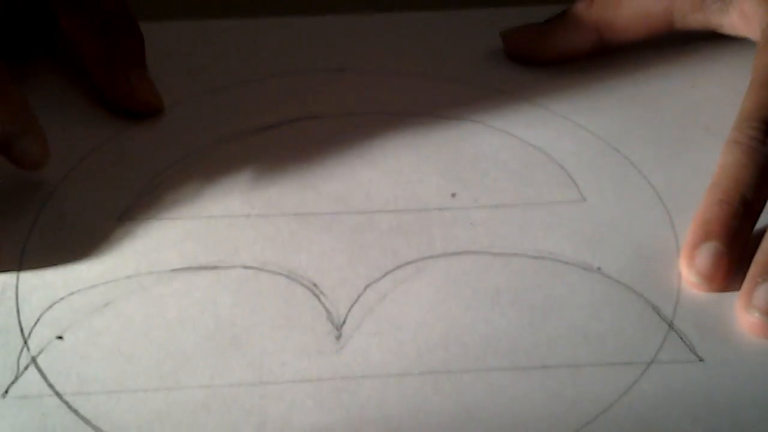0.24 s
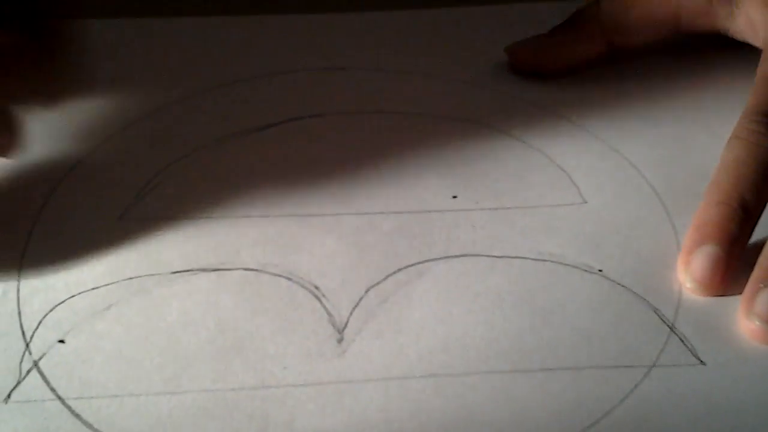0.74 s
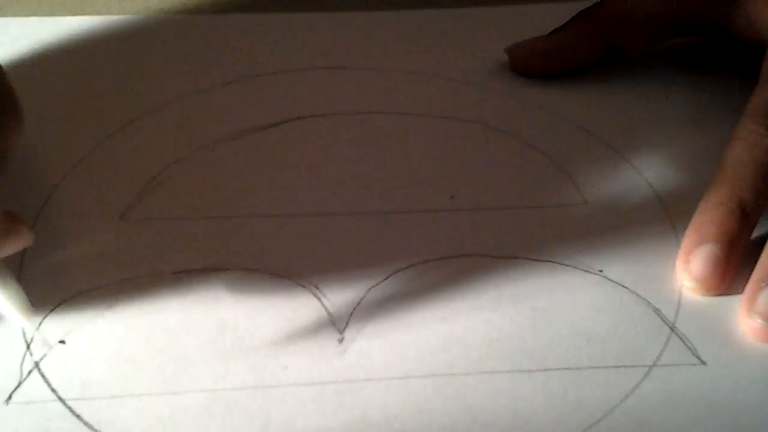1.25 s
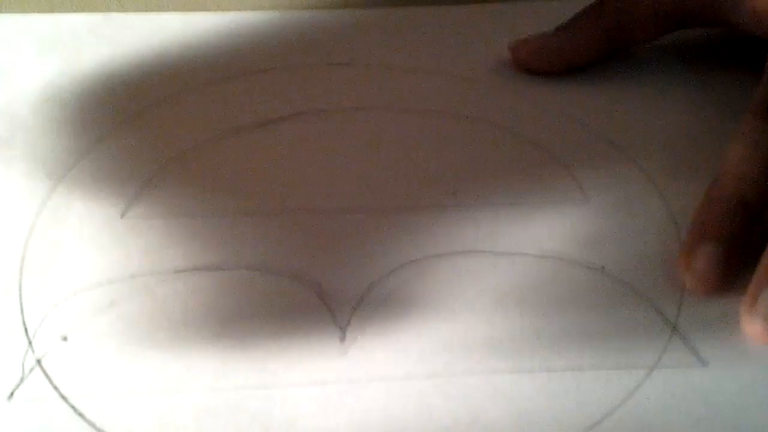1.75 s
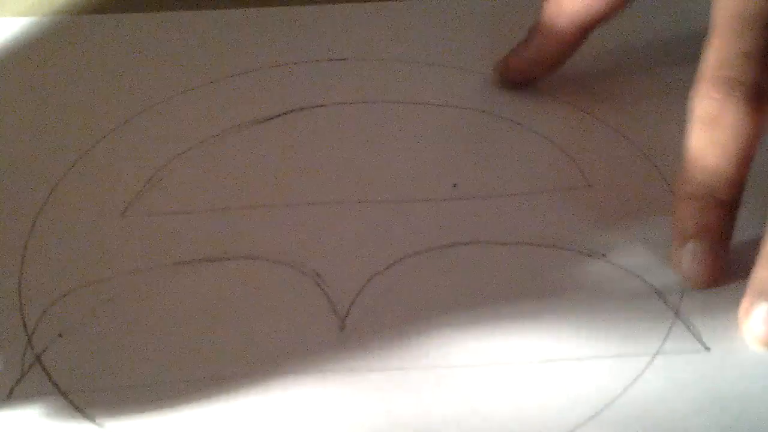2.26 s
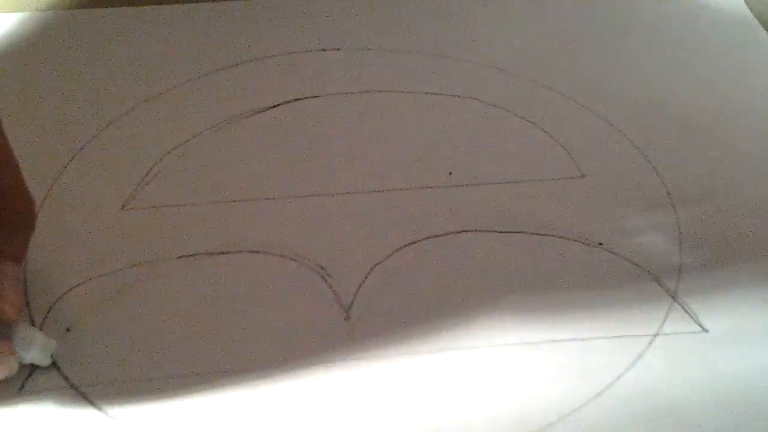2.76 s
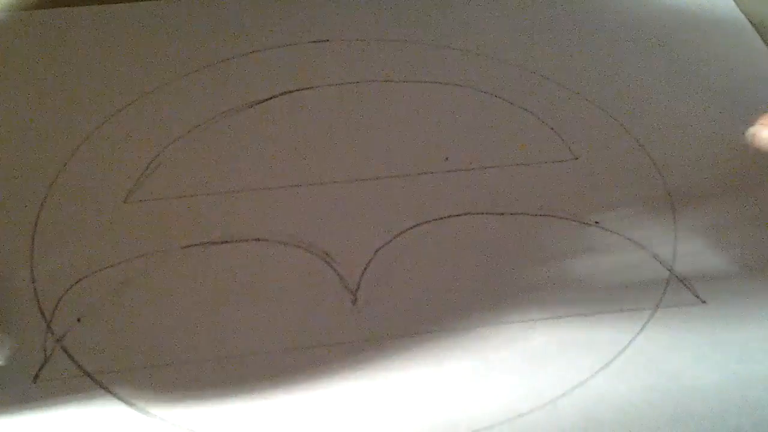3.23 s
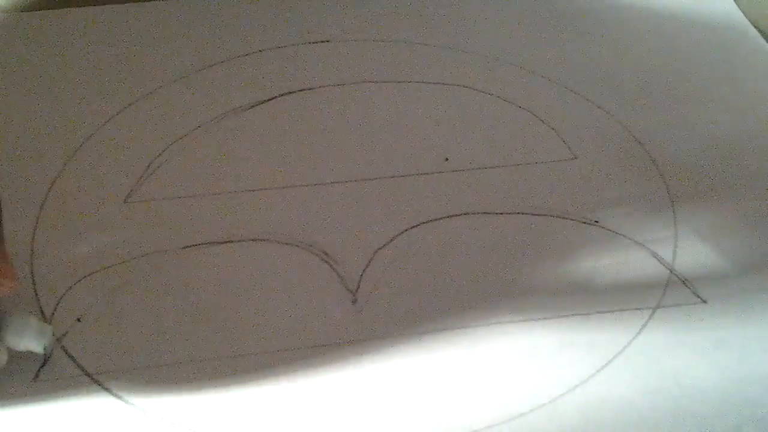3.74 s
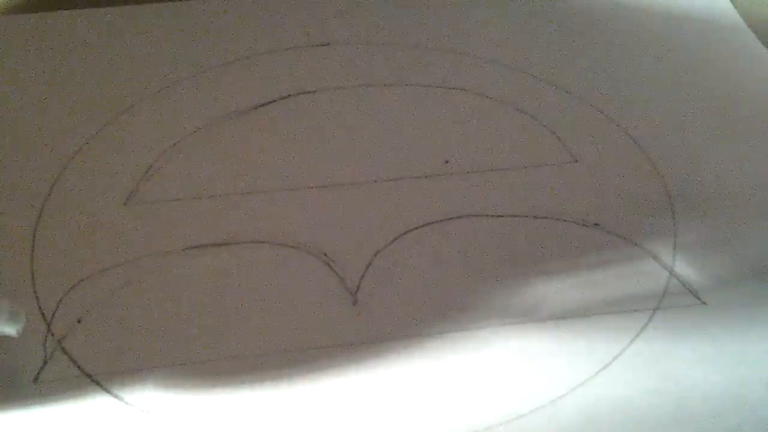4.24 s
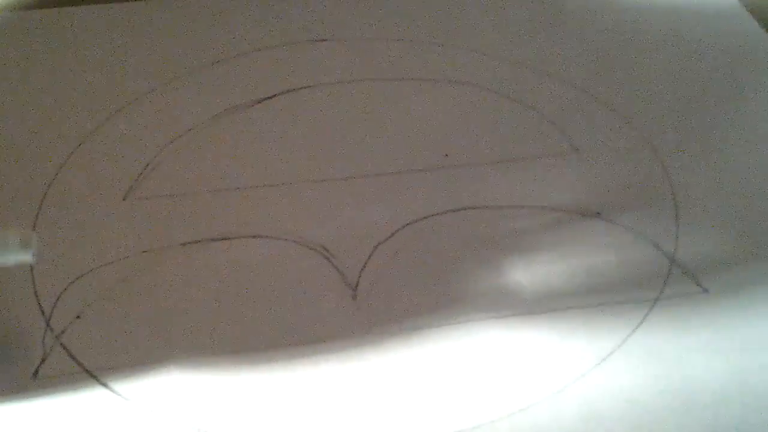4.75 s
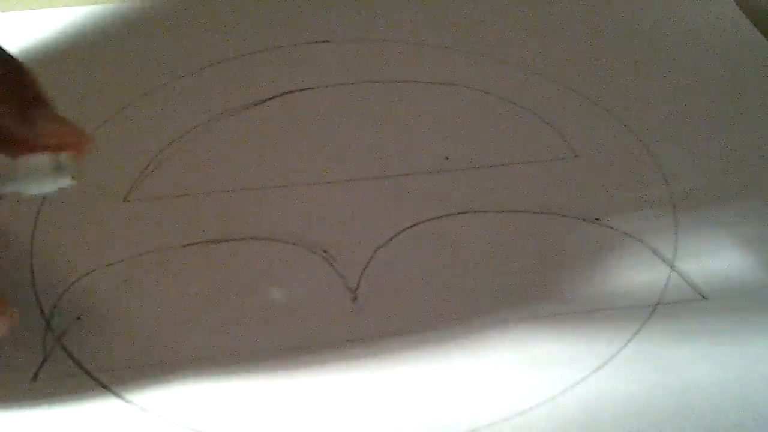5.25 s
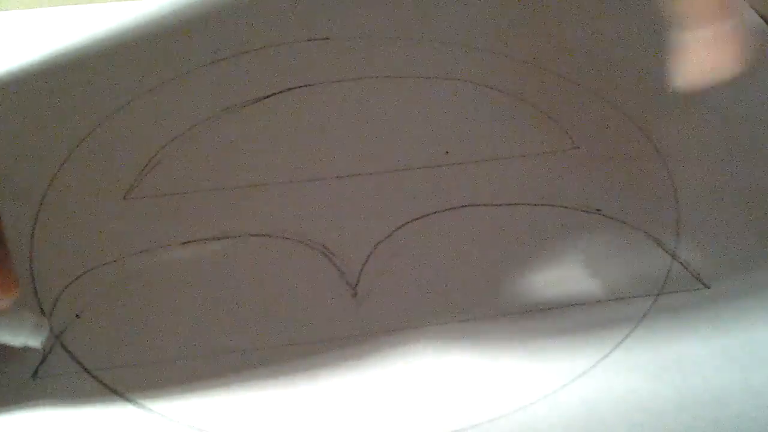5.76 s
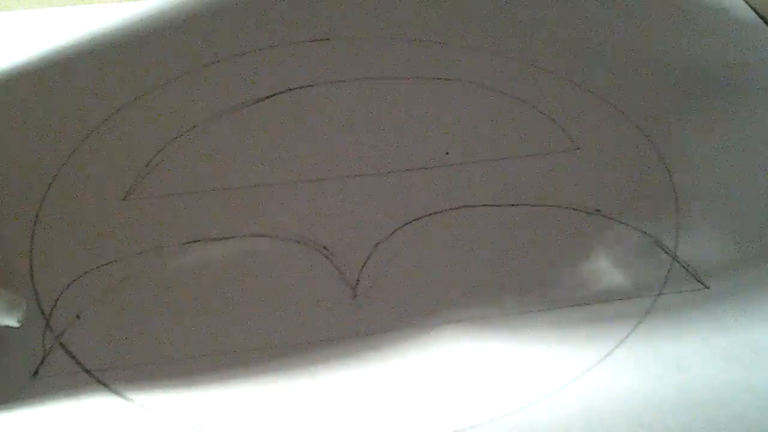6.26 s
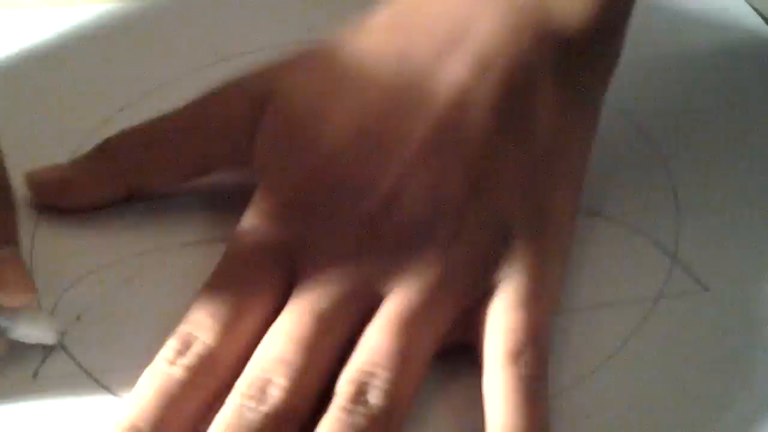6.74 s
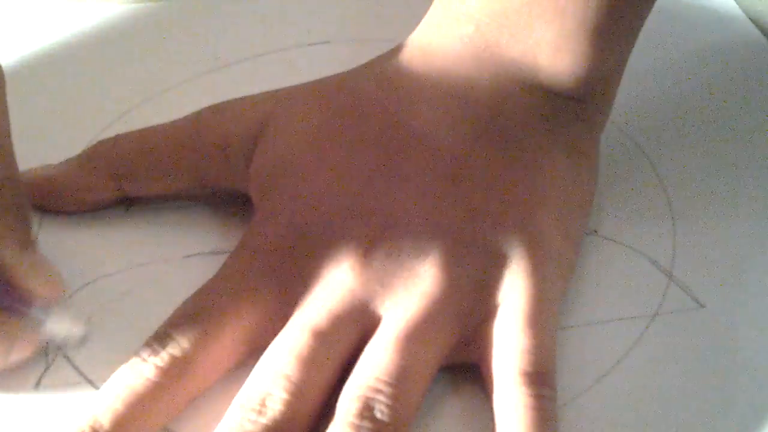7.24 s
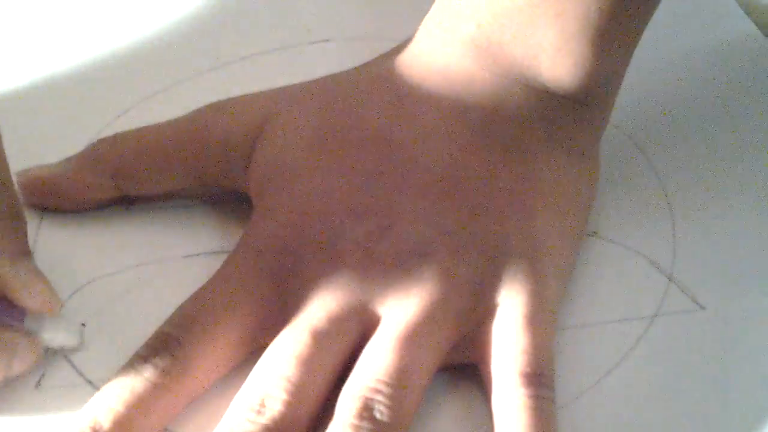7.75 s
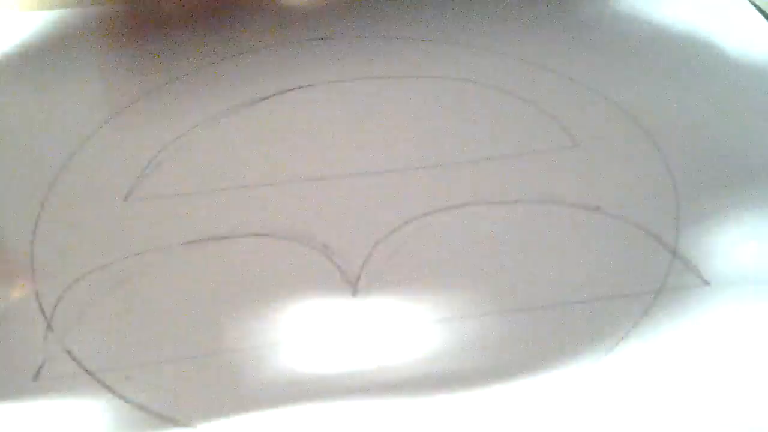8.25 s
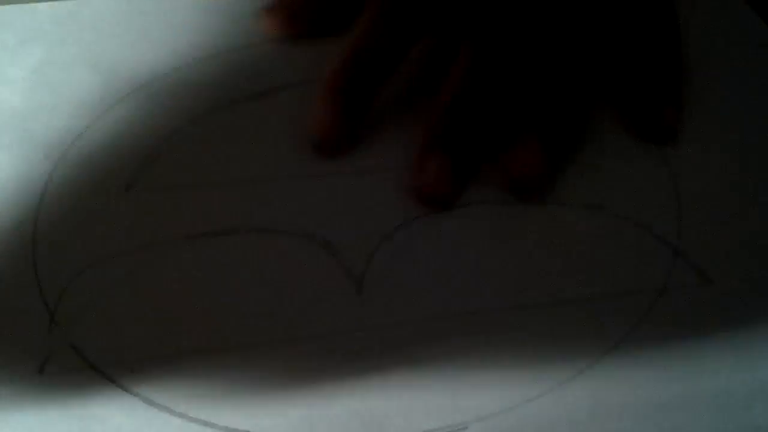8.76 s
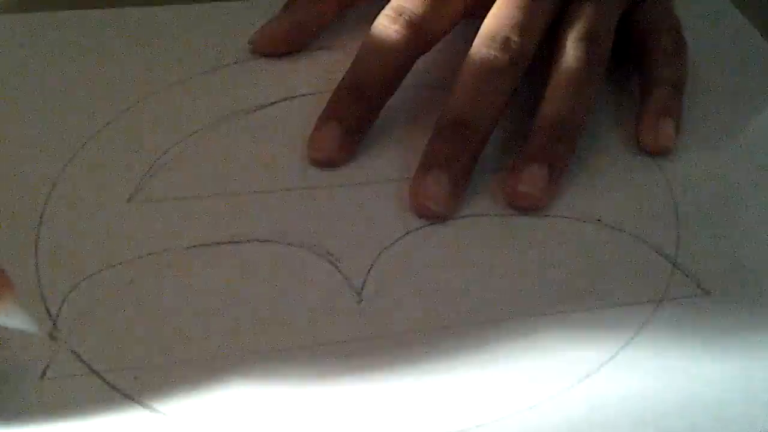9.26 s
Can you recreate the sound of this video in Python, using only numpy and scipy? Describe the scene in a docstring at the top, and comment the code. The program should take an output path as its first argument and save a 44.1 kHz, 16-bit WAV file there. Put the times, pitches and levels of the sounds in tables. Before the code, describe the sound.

Close to a small microphone in a quiet room, hands shift a large sheet of paper on a desk. Faint rubs and a lull come first, then a cluster of knocks and crisp paper snaps near two seconds. Short scrapes continue, peaking in a sharp crackle around five seconds, then thinning to near silence before soft rubbing resumes.

```python
"""Hands and a wrapped pencil end rub and shift a large sheet of paper on a desk, close to a small camera.
Faint rubs and a quiet gap come first; strokes, snaps and taps crowd near 2 s and are loudest around 5 s.
Then the handling slackens, nearly stops after 7.5 s, and takes up again softly from 8 s to the end.
Dense grains of fibre slip ring sheet and desk; snaps, taps and thuds are short bursts of ringing.
Room noise lies under it all; two close microphone ports hear nearly the same sound."""
import sys
import numpy as np
from scipy import signal
from scipy.io import wavfile
from scipy.ndimage import uniform_filter1d

SR = 44100
rng = np.random.default_rng(int(sys.argv[2]) if len(sys.argv) > 2 else 0)


def bounce(signal):
    """Save signal as a 16-bit WAV file at the path given by the first command-line argument."""
    frames = np.transpose(np.atleast_2d(signal))
    limited = np.clip(frames, -1, 1)
    pcm = np.round(limited * 32767).astype(np.int16)
    wavfile.write(sys.argv[1], SR, pcm)


def convert_level_to_amplitude(level_db):
    """Map a level in decibels to its linear amplitude factor."""
    exponent = np.asarray(level_db, float) / 20
    return 10 ** exponent


N = 418931

# Room noise spectrum. Each row: frequency in Hz, relative density in dB.
ROOM_SPECTRUM = [(12, -5.5), (25, -17), (43, -22), (62, -31.5), (106, -12.5), (224, -8), (394, -6),
                 (749, -10), (1060, -15), (3180, -14.5), (5140, -21), (13800, -21), (15000, -26)]
ROOM_RMS_DB = -69
# Left-right likeness of the room noise. Each row: frequency in Hz, correlation from 0 to 1.
ROOM_LIKENESS = [(60, 0.99), (180, 0.98), (550, 0.98), (1650, 0.92), (4970, 0.72), (15000, 0.054)]
# Thin tones, faint in the quiet and stronger amid the handling. Each row: start in seconds, end in seconds,
# pitch in Hz, rms before the fades in dB.
TONES = [(0, 0.1, 1900, -74), (0.898, 1.15, 2150, -75), (1.4, 1.717, 1845, -73.5),
         (2.017, 2.082, 1850, -55), (4.29, 4.36, 3810, -53), (7.683, 7.853, 2390, -75)]

# Desk radiation spectrum. Each row: frequency in Hz, relative density in dB.
DESK_SPECTRUM = [(35, -68), (60, -26.5), (121, -14), (280, -7.5), (405, -1), (471, -3), (702, -3.5),
                 (762, -4.5), (1600, -13), (2080, -34), (3520, -120)]
# Desk top modes. Each row: frequency in Hz, width in Hz, relative gain in dB.
DESK_MODES = [(225, 11, -4.5), (328.6, 19, 2), (407, 18, -0.5), (614, 130, -7), (928, 29, -8),
              (1880, 36, -9)]
# The heel of the hand settles and the whole desk thuds. Each row: start in seconds, burst peak in dB.
THUDS = [(0.177, -55), (0.208, -59), (0.55, -68), (1.86, -62), (1.939, -51.5), (2.0, -57), (2.045, -57),
         (3.364, -56), (4.029, -62), (6.813, -61)]
# Fingers and wrist land on the desk. Each row: start in seconds, blow peak in dB, ring in Hz.
TAPS = [(0.117, -39, 875), (0.1809, -40.5, 423), (0.207, -46, 362), (0.304, -45.5, 374), (0.554, -47, 392),
        (1.86, -56, 608), (1.9345, -29, 440), (1.948, -34, 326), (1.999, -38, 295), (2.0452, -27, 376),
        (2.189, -23.5, 426), (2.4, -47.5, 470), (2.455, -35, 490), (2.95, -43, 424), (3.3654, -34.5, 370),
        (3.441, -44.5, 680), (3.637, -44.5, 610), (3.789, -50, 423), (4.322, -42.5, 553), (4.359, -42, 420),
        (4.657, -36, 627), (4.845, -39, 800), (4.862, -34, 550), (5.151, -38, 400), (5.422, -40, 700),
        (6.135, -34.5, 820), (6.812, -47, 655), (7.068, -41.5, 637)]

# The sheet buckles or the pencil lands. Each row: start in seconds, ring burst peak in dB, ring in Hz,
# treble edge share in dB (before a fixed factor).
SNAPS = [(0.1182, -30, 2600, -37), (0.212, -38, 2820, -15), (0.308, -32.5, 2760, -25),
         (0.624, -39.5, 2700, -27), (1.3356, -38, 2550, -28), (1.347, -38, 2880, -32),
         (1.876, -38.5, 3820, -9), (1.9516, -33, 2730, -13), (1.9941, -20.5, 2170, -12.5),
         (2.181, -26, 2600, -30), (2.199, -17, 2480, -38), (2.209, -19, 2880, -37), (2.28, -28, 3150, -21),
         (2.531, -44, 3600, -25), (2.669, -36.5, 2820, -32), (2.811, -29, 3400, -34),
         (2.9525, -37, 1220, -25), (3.489, -36, 2700, -33), (3.643, -32.5, 2250, -36),
         (3.7926, -30.5, 1680, -38), (4.13, -35.5, 2260, -29), (4.659, -19.5, 2470, -52),
         (4.6605, -24.5, 1070, -45), (4.867, -19.5, 2800, -13), (5.153, -18.5, 3000, -23),
         (5.1625, -15.5, 2750, -40), (5.188, -21, 3180, -35), (5.4148, -30, 2520, -37),
         (5.6405, -46, 2460, -25), (5.678, -40, 1800, -18), (5.901, -40.5, 2090, -27),
         (5.9188, -42, 2170, -25), (6.1414, -28.5, 2620, -32), (6.338, -44, 2800, -27),
         (6.876, -48, 1510, -27), (6.927, -43.5, 2520, -13), (7.0757, -24.5, 1970, -38),
         (7.158, -43, 1950, -16), (7.354, -40, 2760, -22), (7.395, -50, 1500, -28), (8.283, -40, 3300, -4),
         (8.6674, -51.5, 1500, -32), (9.1986, -45, 2650, -37), (9.263, -36, 3230, -19),
         (9.3312, -34, 3400, -19)]
RATTLE_DB = -9  # slips that follow a snap, relative to its burst
# The sheet crumples in a dense cluster of slips. Each row: start in seconds, level in dB (before a fixed
# factor), ring in Hz, nominal length in seconds.
CRUNCHES = [(0.103, -50, 2700, 0.0097), (2.158, -36, 2800, 0.035), (2.444, -30, 670, 0.045),
            (2.446, -34.5, 1400, 0.028), (2.479, -43, 725, 0.095), (2.53, -48, 806, 0.1),
            (4.272, -27, 2980, 0.0078), (4.354, -30.5, 2800, 0.021), (4.864, -26.5, 2800, 0.014),
            (5.153, -19.5, 3170, 0.024), (5.789, -42, 1660, 0.014), (5.802, -43.5, 2900, 0.0069),
            (7.042, -38.5, 2420, 0.014), (7.4, -47, 2930, 0.024), (7.942, -49, 3000, 0.023)]

# Hands and pencil end move over the sheet. Each row: fastest moment in seconds, drive level in dB,
# rise in seconds, fall in seconds, desk weight in dB (before a fixed share).
STROKES = [(0.12, -50.5, 0.041, 0.07, -4.5), (0.216, -49, 0.07, 0.07, 5), (0.319, -51, 0.05, 0.12, -6),
           (0.554, -59.5, 0.045, 0.15, 3), (0.634, -55.5, 0.036, 0.05, 1.5), (0.878, -59, 0.11, 0.11, -2),
           (1.347, -56.5, 0.037, 0.074, 2), (1.383, -49, 0.079, 0.093, 0), (1.731, -69, 0.041, 0.047, -3),
           (1.842, -62.5, 0.0077, 0.077, 9.5), (1.881, -47.5, 0.033, 0.21, -5),
           (1.954, -41, 0.017, 0.19, -8), (2.055, -65, 0.017, 0.12, 9), (2.192, -34.5, 0.048, 0.18, -2.5),
           (2.462, -46.5, 0.027, 0.1, 11.5), (2.81, -38, 0.059, 0.063, -5),
           (2.854, -46.5, 0.093, 0.038, -0.5), (3.223, -64, 0.055, 0.17, 1),
           (3.372, -63.5, 0.027, 0.087, 10), (3.495, -48.5, 0.025, 0.12, -10),
           (3.72, -51.5, .04, 0.081, -12), (3.86, -51, 0.1, 0.069, -14), (4.006, -50, 0.018, 0.14, -25),
           (4.05, -45.5, 0.06, 0.21, -9.5), (4.26, -61, 0.12, .05, 0), (4.277, -43, 0.012, 0.095, -9.5),
           (4.364, -46.5, 0.021, 0.1, -5), (4.475, -65, 0.066, 0.06, -20), (4.666, -61, 0.016, 0.3, 9.5),
           (4.866, -25, 0.01, 0.034, -12), (4.907, -37.5, .05, 0.14, -11.5), (5.26, -40, 0.12, 0.21, -8.5),
           (5.423, -46, 0.065, 0.04, -1), (5.692, -63, 0.16, 0.082, 0.5), (5.802, -57, .024, 0.059, -5.5),
           (5.907, -57.5, 0.02, 0.059, 0), (6.142, -46.5, 0.12, 0.056, -5), (6.25, -47.5, 0.16, 0.072, -24),
           (6.815, -59, 0.052, 0.071, 0), (6.939, -56, 0.11, 0.18, -1), (7.079, -44.5, 0.04, 0.044, -4.5),
           (7.16, -62, 0.091, 0.12, 3), (7.353, -60, 0.038, 0.077, -7), (7.408, -55.5, 0.064, 0.047, 0.5),
           (8.275, -50, 0.12, 0.086, -6), (8.39, -47.5, 0.32, 0.18, -1), (8.53, -60.5, .05, 0.14, 4.5),
           (8.81, -63, 0.082, 0.092, -5), (8.995, -55.5, 0.021, 0.1, -6.5),
           (9.034, -53.5, 0.046, 0.054, -13), (9.204, -54, 0.031, 0.047, 2), (9.269, -53, 0.014, 0.1, -5),
           (9.339, -50.5, 0.07, 0.078, -3), (9.495, -54, 0.019, .05, -5)]
# A hand keeps sliding. Each row: start in seconds, end in seconds, drive level at start in dB,
# drive level at end in dB, desk weight in dB (before a fixed share).
SLIDES = [(2.036, 2.124, -56, -60, 10.5), (2.508, 2.7, -58, -52, -3), (2.956, 3.104, -54.5, -55, -2.5),
          (3.367, 3.48, -59.5, -64.5, 9.5), (3.644, 3.76, -54, -55, -7), (3.796, 3.938, -51.5, -62, -2.5),
          (4.287, 4.35, -50.5, -52.5, -14), (4.662, 4.843, -59, -42, -8.5),
          (5.158, 5.228, -29.5, -36.5, -9.5), (5.435, 5.632, -50.5, -64, -4),
          (6.143, 6.355, -51.5, -55, -2), (6.382, 6.529, -62.5, -61, -1.5), (6.61, 6.753, -64.5, -77, -4),
          (7.948, 8.1, -61.5, -87.5, 1), (8.15, 8.509, -60, -52, -1)]
SWING_DB = 20  # gained in a rise time, lost in a fall time
LAND_S, LIFT_S = 0.022, 0.064  # rise and fall time at the ends of a slide
DESK_FOLLOWS = 0.81  # the heavy desk swells and dies less steeply than the sheet
USUAL_DB = -50  # a middling stroke
HISS_DB, HISS_FOLLOWS = -61, 0.68  # fibre hiss of a middling stroke; dB of hiss per dB of sheet
# Sheet radiation spectrum. Each row: frequency in Hz, relative density in dB.
SHEET_SPECTRUM = [(500, -41), (900, -4), (1500, -5), (2500, -4), (3500, -1.5), (4200, -3), (5600, -10),
                  (8500, -45)]
# Fibre hiss spectrum. Each row: frequency in Hz, relative density in dB.
FIBRE_SPECTRUM = [(3500, -25.5), (5200, -15.5), (6500, -8), (9000, -10), (14500, -14)]
# The free area of the sheet sets its ring. Each row: time in seconds, mean ring in Hz.
FREE_AREA_RING = [(0.0, 1890), (0.08, 2560), (1.32, 2520), (1.38, 2960), (1.561, 1830), (1.88, 3120),
                  (2.04, 2320), (2.27, 2740), (2.46, 1820), (2.62, 3250), (3.86, 2260), (4.05, 3540),
                  (4.15, 2340), (4.31, 3460), (4.42, 2480), (5.25, 3300), (5.79, 1900), (5.84, 2220),
                  (6.98, 2750), (7.06, 2380), (8.25, 3370), (8.4, 2580), (8.63, 3040), (8.679, 1662),
                  (8.73, 2800), (9.5, 3160)]
# Air gap and sheet ring in narrow bands that come and go as the hands shift.
# Each row: mean frequency in Hz, width in Hz, mean gain in dB.
SHEET_MODES = [(1980, 165, -9.5), (2400, 340, -5), (2800, 187, -4), (3300, 225, -4.5), (4050, 213, -7.5)]

# Scattered sound at the ports. Each row: frequency in Hz, level relative to the direct sound in dB.
SCATTER_SPECTRUM = [(100, -63), (500, -14), (1500, -18.5), (3000, -11.5), (6000, -0.5), (12000, -2)]
LAG_S = 19e-6  # the left port hears later
DULL_HZ, DULL_OVER_DB, DULL_DB_PER_DB = 10240, -39.5, 3.5  # the top treble thins in loud passages
EDGE_HZ = 14550  # band limit
OFFSET = -0.0002  # the converter rests slightly off zero


def evened(x):
    """Scales to rms 1."""
    return x / np.sqrt(np.mean(x ** 2) + 1e-20)


def read(points, hz):
    """Value of a spectrum at hz, interpolated over log frequency."""
    f, value = np.transpose(points)
    return np.interp(np.log(hz + 1), np.log(f + 1), value)


def add(mix, start_s, sound):
    """Mixes a sound in at start_s."""
    part = mix[max(round(start_s * SR), 0):][:len(sound)]
    part += sound[:len(part)]


def coloured(x, points):
    """Causal minimum-phase filter of energy 1 with the given spectrum."""
    level_db = np.maximum(read(points, abs(np.fft.fftfreq(8192, 1 / SR))), -70)
    response = np.exp(np.conj(signal.hilbert(np.log(convert_level_to_amplitude(level_db)))))
    taps = np.fft.ifft(response).real[:4096]
    rows = signal.oaconvolve(np.atleast_2d(x), taps[None] / np.linalg.norm(taps), axes=1)
    return rows[:, :x.shape[-1]].reshape(x.shape)


def resonate(x, hz, width_hz):
    """A resonance of gain 1 that follows the curve hz: shift to zero, smooth, shift back."""
    turn = np.exp(2j * np.pi * np.cumsum(hz * np.ones(len(x))) / SR)
    r = np.exp(-np.pi * width_hz / SR)
    return 2 * (turn * signal.lfilter([1 - r], [1, -r], x / turn)).real


def wander(seconds):
    """Slow chance of rms 1."""
    size = int(seconds * SR)
    return evened(uniform_filter1d(uniform_filter1d(rng.standard_normal(N), size), size))


def burst(t, hz, seconds):
    """A few cycles that swell softly and die, peak 1."""
    ring = np.sin(2 * np.pi * hz * t) * (t / seconds) ** 2 * np.exp(-t / seconds)
    return ring / abs(ring).max()


def room_noise():
    """Steady air and circuit noise, alike at both ports in the bass."""
    frames, hz = N // 1024 + 5, np.fft.rfftfreq(4096, 1 / SR)
    a, b, c, d, patches = rng.standard_normal((frames, 2049, 5)).T
    patches = evened(uniform_filter1d(uniform_filter1d(patches, 48, 0), 4, 1))
    same = np.clip(read(ROOM_LIKENESS, hz), -1, 1)[:, None]
    left = a + 1j * b
    right = same * left + np.sqrt(1 - same ** 2) * (c + 1j * d)
    z = np.array([left, right]) * convert_level_to_amplitude(read(ROOM_SPECTRUM, hz)[:, None] + 0.57 * patches)
    noise = signal.istft(z, nperseg=4096, noverlap=3072)[1][:, :N]
    return convert_level_to_amplitude(ROOM_RMS_DB) * evened(noise)


def tones():
    """Breathy, flickering tones, noise through a narrow resonance, that fade in and out."""
    out, noise = np.zeros(N), rng.standard_normal(N)
    flicker = convert_level_to_amplitude(2.5 * wander(0.02))
    for start_s, end_s, hz, db in TONES:
        first, size = round(start_s * SR), round((end_s - start_s) * SR)
        tone = resonate(noise[first:][:size], hz, 50.) * flicker[first:][:size]
        add(out, start_s, convert_level_to_amplitude(db) * evened(tone) * signal.windows.hann(size))
    return out


def desk_ring(x):
    """The desk top's modes."""
    return sum(convert_level_to_amplitude(db) * resonate(x, hz, width_hz) for hz, width_hz, db in DESK_MODES)


def thuds():
    """The whole desk gives a few deep cycles, which also excite its modes."""
    out, t = np.zeros(N), np.arange(6000) / SR
    for start_s, db in THUDS:
        add(out, start_s, convert_level_to_amplitude(db) * burst(t, 120.0, 0.0076))
    return out + 0.5 * desk_ring(out)


def taps():
    """A soft blow: a few cycles under the finger and a dull rumble, which also excite the desk modes."""
    out, t = np.zeros(N), np.arange(6000) / SR
    noise = rng.standard_normal((len(TAPS), len(t)))
    rumbles = coloured(noise * np.minimum(t / 0.0059, 1) * convert_level_to_amplitude(-60 * t / 0.092), DESK_SPECTRUM)
    for (start_s, db, hz), rumble in zip(TAPS, rumbles):
        blow = burst(t, hz, 0.38 / hz)
        rumble = 0.31 * rumble + 0.25 * resonate(rumble, hz, 300.0)  # the struck spot rings at its own pitch
        add(out, start_s + 0.001304, convert_level_to_amplitude(db) * (blow + rumble))  # begins 1.3 ms after the listed start
    return out + 0.5 * desk_ring(out)


def snaps():
    """A few cycles of ring with a sharp noise edge and a brief rattle of smaller slips."""
    out, t = np.zeros(N), np.arange(3000) / SR
    treble = signal.butter(2, [2600., 8000.], "band", fs=SR)
    noise = rng.standard_normal((len(SNAPS), 2, len(t)))
    edges = signal.lfilter(*treble, noise[:, 0] * np.exp(-t / 0.00062))
    for (start_s, db, hz, treble_db), edge, slip in zip(SNAPS, edges, noise[:, 1]):
        rattle = resonate(resonate(slip * convert_level_to_amplitude(-60 * t / 0.0604), hz, 1660.0), hz, 1660.0)
        snap = burst(t, hz, 0.00019) + 5.4 * convert_level_to_amplitude(treble_db) * edge + convert_level_to_amplitude(RATTLE_DB) * rattle
        add(out, start_s, convert_level_to_amplitude(db) * snap)
    return out


def crunches():
    """Grainy noise that swells fast, holds and falls away, ringing around one pitch."""
    out, t = np.zeros(N), np.arange(8000) / SR
    noise = rng.standard_normal((len(CRUNCHES), 2, len(t)))
    for (start_s, db, hz, length_s), (a, b) in zip(CRUNCHES, noise):
        swell = np.minimum(t / (0.197 * length_s), 1) ** 2
        shape = swell * convert_level_to_amplitude(-14 * np.maximum(t / length_s - 0.6, 0) / 0.22)
        grain = a * convert_level_to_amplitude(2.0 * evened(uniform_filter1d(b, size=40)))
        ring = resonate(resonate(grain, hz, 0.49 * hz), hz, 0.49 * hz)
        add(out, start_s, convert_level_to_amplitude(db) * 0.49 * np.sqrt(np.mean(shape ** 2)) * evened(shape * ring))
    return out


def strokes(follows, weight):
    """Level in dB of all movement: strokes swell to their fastest moment and die away, slides carry on."""
    t = np.arange(0, N + 64, 64) / SR
    fastest_s, db, rise_s, fall_s, desk_db = np.transpose(STROKES)[:, :, None]
    drop_db = SWING_DB * np.maximum((fastest_s - t) / rise_s, (t - fastest_s) / fall_s)
    power = (convert_level_to_amplitude(db + weight * desk_db - follows * drop_db) ** 2).sum(0)
    start_s, end_s, first_db, last_db, desk_db = np.transpose(SLIDES)[:, :, None]
    db = first_db + (last_db - first_db) * np.clip((t - start_s) / (end_s - start_s), 0, 1)
    outside = np.maximum((start_s - t) / LAND_S, (t - end_s) / LIFT_S)
    drop_db = SWING_DB * np.maximum(outside, 0)
    power += (convert_level_to_amplitude(db + weight * desk_db - follows * drop_db) ** 2).sum(0)
    return np.interp(np.arange(N) / SR, t, 10 * np.log10(power + 1e-14))


def slips(per_s, spread_db, clump_db, smooth):
    """Fibres let go one by one, in clumps, over a smooth scrape."""
    size = convert_level_to_amplitude(spread_db * np.minimum(rng.exponential(1, N), 4))
    clicks = size * rng.choice([-1., 1.], N) * (rng.random(N) < per_s / SR)
    drive = smooth * rng.standard_normal(N) + evened(clicks)
    return evened(drive * convert_level_to_amplitude(clump_db * wander(0.004) + clump_db * wander(0.029)))


def sheet_ring(x):
    """The sheet's narrow bands, each drifting in pitch and strength."""
    return sum(convert_level_to_amplitude(db + 6.7 * wander(0.039)) * resonate(x, hz * np.exp(0.066 * wander(0.039)), width_hz)
               for hz, width_hz, db in SHEET_MODES)


def rubbing():
    """One train of slips drives sheet, desk and hiss, each by its own share; coarser lumps add to the desk."""
    sheet_db, desk_db = strokes(1, 0), strokes(DESK_FOLLOWS, 0.9)
    hiss_db = HISS_DB + HISS_FOLLOWS * (sheet_db - USUAL_DB) + 1.16 * wander(0.034)  # flares unevenly
    drive = slips(per_s=1500, spread_db=1.5, clump_db=0.72, smooth=1.0)
    lumps = slips(per_s=310, spread_db=4.0, clump_db=3.0, smooth=0.98) * convert_level_to_amplitude(desk_db)
    plain = coloured(drive * convert_level_to_amplitude(sheet_db), SHEET_SPECTRUM)
    # the free area of the sheet changes under the hands
    ring_hz = np.interp(np.arange(N) / SR, *np.transpose(FREE_AREA_RING)) * np.exp(0.058 * wander(0.013))
    free_ring = resonate(resonate(plain, ring_hz, 2305.0), ring_hz, 1890.0)
    sheet = 0.51 * plain + 0.44 * free_ring + 0.49 * sheet_ring(plain)
    desk = coloured(0.45 * drive * convert_level_to_amplitude(desk_db) + 0.34 * lumps, DESK_SPECTRUM) + 2.8 * desk_ring(lumps)
    hiss = coloured(drive * convert_level_to_amplitude(hiss_db), FIBRE_SPECTRUM)
    return sheet + desk + hiss


def ports(x):
    """Direct sound with a tiny lag, plus scattered sound that differs at each port and keeps changing."""
    hz, t, z = signal.stft(x, SR, nperseg=128, noverlap=96)
    a, b = rng.standard_normal((len(t), len(hz), 2, 2)).T
    scatter = convert_level_to_amplitude(read(SCATTER_SPECTRUM, hz))[:, None]
    direct = np.array([np.exp(-2j * np.pi * hz * LAG_S), np.ones(len(hz))])[:, :, None]
    z = z * (direct + scatter * (a + 1j * b)) / np.sqrt(1 + scatter ** 2)
    return signal.istft(z, SR, nperseg=128, noverlap=96)[1][:, :N]


def scene():
    """All near sounds through the ports, over the room noise."""
    near = tones() + thuds() + taps() + snaps() + crunches() + rubbing()
    # the microphones cut the deep bass
    near = signal.sosfilt(signal.butter(4, 95., "high", fs=SR, output="sos"), near)
    return room_noise() + ports(near)


def dulled(x):
    """Turns the top treble down by how far the smoothed level passes a threshold."""
    power = abs(uniform_filter1d((x ** 2).mean(0), size=800, origin=300))
    level_db = 10 * np.log10(power + 1e-12)
    fall_db = np.arange(N) * 96.0 / SR  # the loss lets go at 96 dB of level a second
    level_db = np.maximum.accumulate(level_db + fall_db) - fall_db
    cut = signal.firwin(255, DULL_HZ, pass_zero=False, fs=SR)
    top = signal.oaconvolve(x, cut[None], "same")
    return x - top * (1 - convert_level_to_amplitude(-DULL_DB_PER_DB * np.maximum(level_db - DULL_OVER_DB, 0)))


def band_limit(x):
    """A steep low-pass at the top of the band."""
    return signal.sosfilt(signal.butter(12, 15680, fs=SR, output="sos"), x)


def record(dry):
    """Treble loss on loud sounds, the band limit and the converter's offset."""
    edge = signal.firwin(1023, EDGE_HZ, window=("kaiser", 9), fs=SR)
    mix = signal.oaconvolve(dulled(dry), edge[None], "same") + OFFSET
    return band_limit(mix)


dry = scene()
out = record(dry)
bounce(out)
```